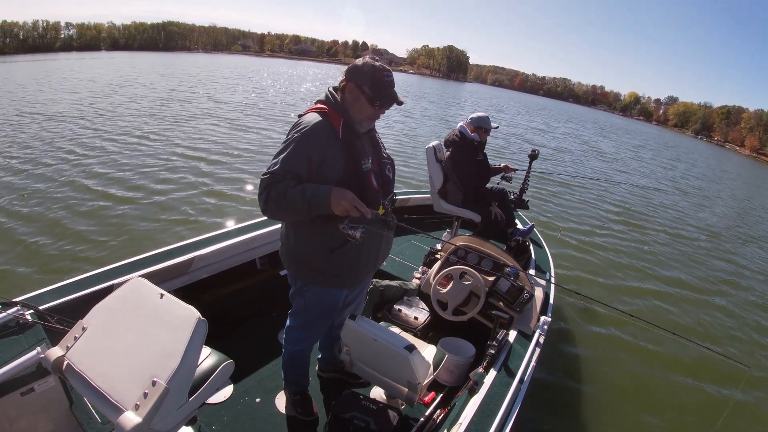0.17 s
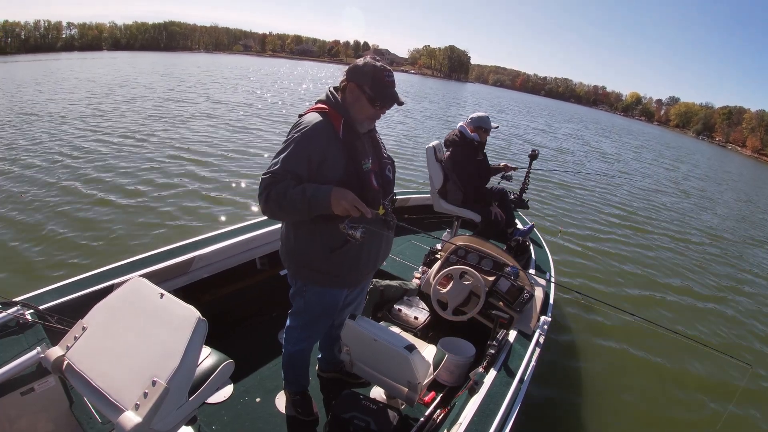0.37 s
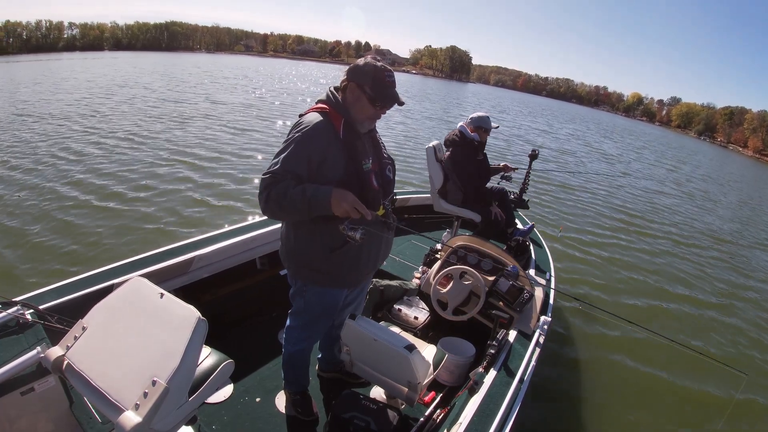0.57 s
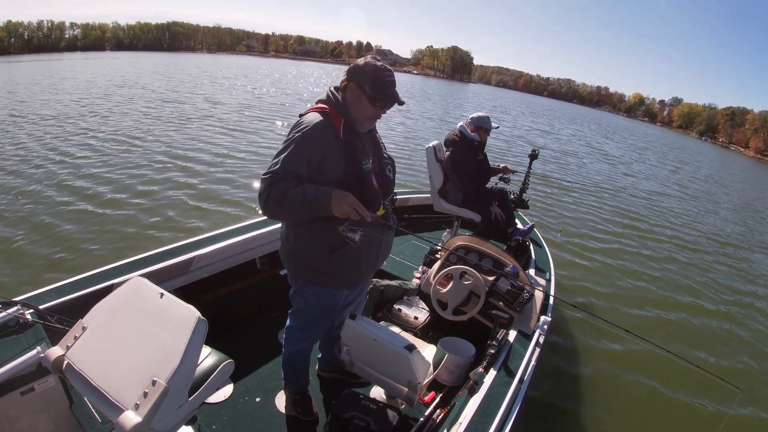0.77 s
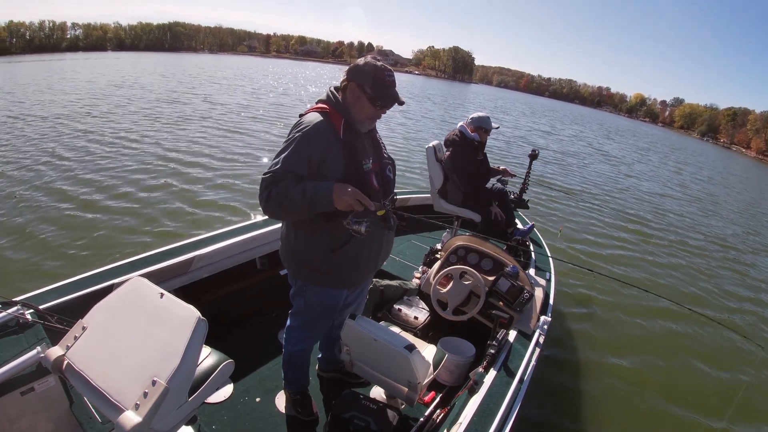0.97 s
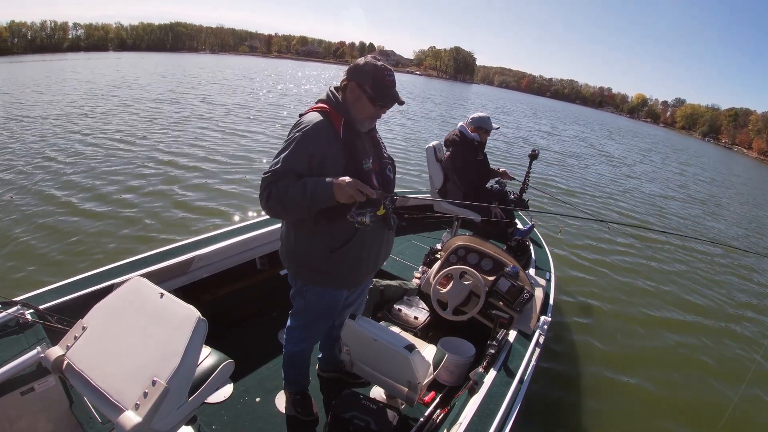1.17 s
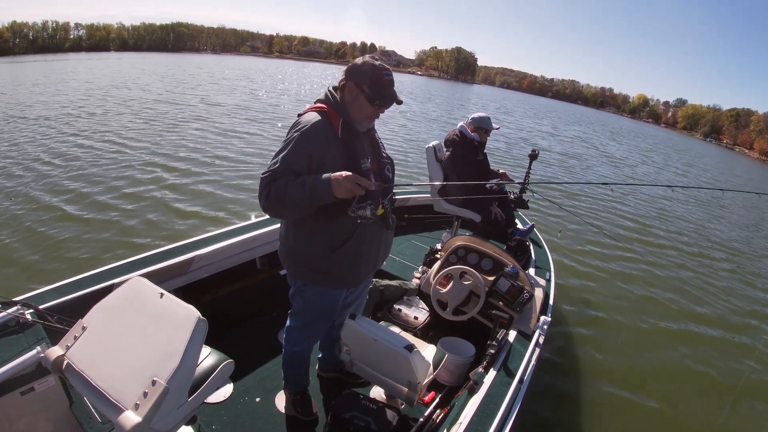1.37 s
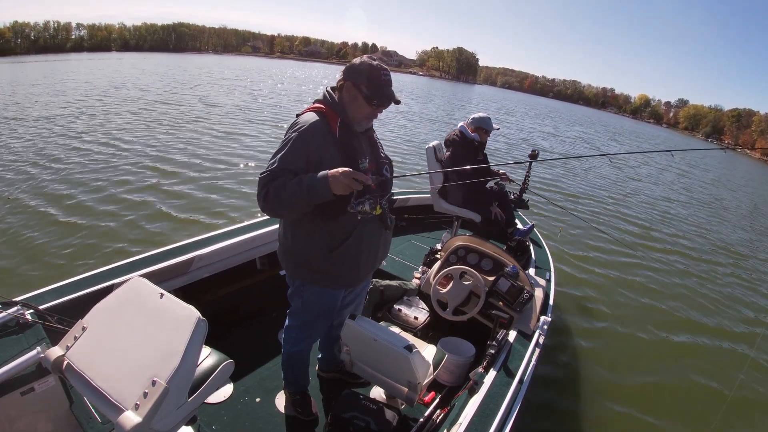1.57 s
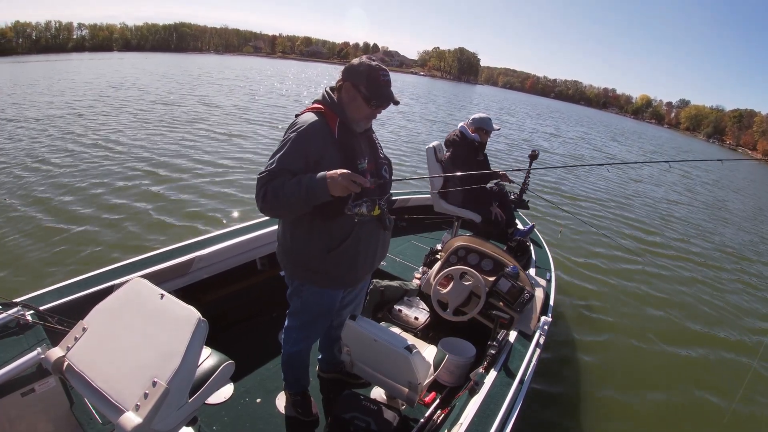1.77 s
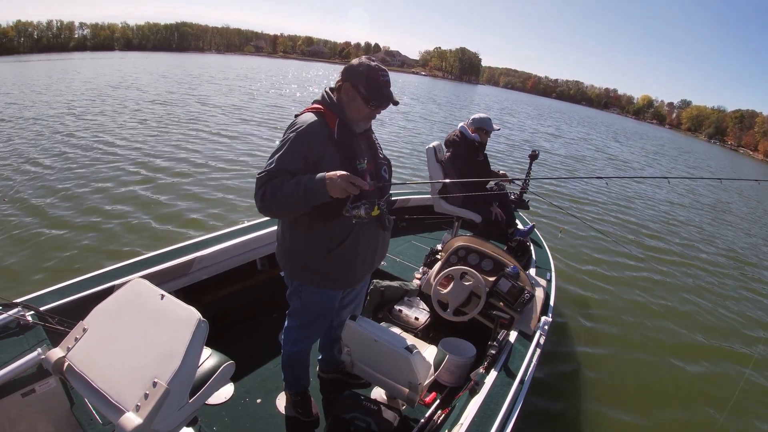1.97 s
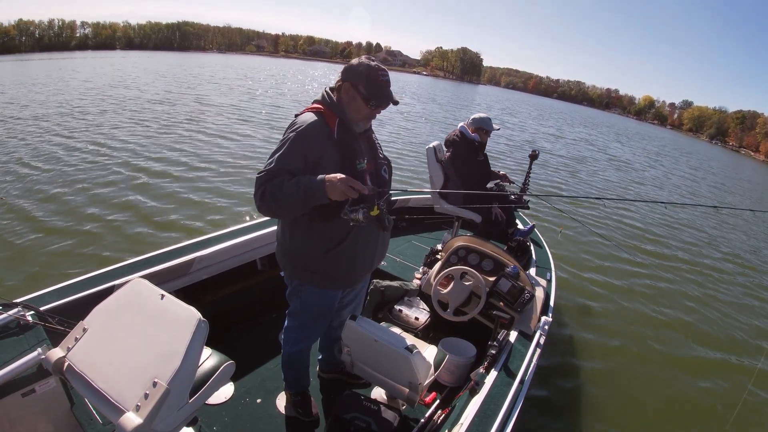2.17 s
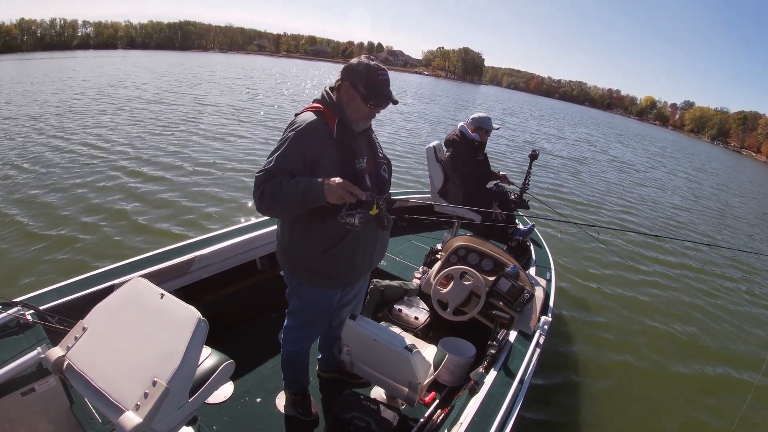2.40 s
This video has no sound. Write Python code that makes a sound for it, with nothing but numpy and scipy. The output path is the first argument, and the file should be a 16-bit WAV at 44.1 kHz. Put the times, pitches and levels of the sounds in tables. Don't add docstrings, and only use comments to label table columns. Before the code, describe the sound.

Small waves slap a metal boat hull with dull knocks and gulps, wind rumbling low

```python
import sys
import numpy as np
from scipy import signal
from scipy.fft import rfft, irfft, next_fast_len
from scipy.io import wavfile
from scipy.ndimage import uniform_filter1d, map_coordinates

SR = 44100
rng = np.random.default_rng(int(sys.argv[2]) if len(sys.argv) > 2 else 0)


def inscribe(sig):
    pcm = np.round(np.clip(np.atleast_2d(sig).T, -1, 1) * 32767)
    wavfile.write(sys.argv[1], SR, pcm.astype(np.int16))


def amplitude_ratio(level_db):
    exponent = np.asarray(level_db, float) / 20
    return 10 ** exponent


N = 107471


def unit(x):
    return x / np.sqrt(np.mean(x ** 2) + 1e-20)


def wobble(rate, size=None):
    size = size or N
    knots = rng.standard_normal(size // 60)
    return map_coordinates(knots, [np.arange(size) * rate / SR])


def noise(gain, size=None):
    size = size or N
    m = next_fast_len(size + 8192)
    spectrum = rfft(rng.standard_normal(m)) * gain(np.fft.rfftfreq(m, 1 / SR))
    return unit(irfft(spectrum, m)[:size])


def along(points):
    f, v = np.transpose(points)
    return lambda hz: amplitude_ratio(np.interp(np.log(hz + 1), np.log(f + 1), v))


def hump(centre_hz, width_hz):
    return lambda hz: np.exp(-2 * ((hz - centre_hz) / width_hz) ** 2)


def add(track, s, sound):
    track[max(round(s * SR), 0):][:len(sound)] += sound


def slaps():
    # [start_s, peak_db, low_db and high_db (panels over the middle ones), t60_s]
    waves = [(.109, -43.5, 3, -15.5, 0.14), (0.135, -52, 6.5, -25, 0.14), (.17, -56.5, 1.5, -4, 0.35),
             (0.217, -54, 3, -3, 0.059), (0.265, -42, -5.5, -26.5, 0.17), (.294, -63, 6.5, -17, 0.24),
             (0.405, -64, 4, -17, 0.21), (0.0, -63, 4, -8, 0.079), (2.27, -66, 11.5, -25, 0.34),
             (0.497, -72, -3, -13, 0.13), (.714, -60, 8, -15, 0.13), (0.875, -64, 0.5, -15, 0.42),
             (1.177, -60, -11, -33, 0.07), (1.312, -48, -18, -5.5, 0.13), (1.336, -41, 0, -21, 0.063),
             (1.361, -55, 5.5, -17, 0.16), (1.588, -54, 3, -15, 0.17), (1.758, -58.5, -3, -17, 0.12),
             (1.896, -44.5, 1.5, -26, 0.23), (1.919, -45.5, -4.5, -12.5, 0.19),
             (1.974, -52.5, -2.5, -27, 0.11), (2.075, -61, -8, -9, 0.14), (2.214, -56, -2.5, -12.5, 0.22),
             (2.342, -51, 4.5, -5, 0.13), (2.396, -39, -3, -8.5, 0.083), (2.42, -34, -3, -11, 0.047)]
    # [pitch_hz, level_db]
    low_panels = [(85, -7.5), (135, -5), (180, -4.5), (225, -1)]
    middle_panels = [(308, -5), (365, -5.5)]
    high_panels = [(500, 3), (600, -9), (680, -0.5), (790, -4)]
    rise_s, trim_db, slosh_db = 0.005024, -1.5, -8
    high_damping = 0.47
    roughness = 0.3
    out, t = np.zeros(N + SR), np.arange(SR // 3) / SR
    rise = 1 - np.exp(-(t / rise_s) ** 2)
    for s, db, low_db, high_db, t60 in waves:
        slosh_colour = [(90, low_db - 10.5), (190, low_db), (340, -5.5),
                        (600, high_db), (1300, high_db - 32), (3000, -75)]
        slosh = noise(along(slosh_colour), size=len(t))
        sound = amplitude_ratio(slosh_db - 60 * t / max(t60, 0.02)) * slosh
        groups = ((low_panels, low_db, t60), (middle_panels, 0, t60),
                  (high_panels, high_db, t60 * high_damping))
        for panels, over_db, life_s in groups:
            for hz, level_db in panels:
                struck_hz = hz * (1 + 0.027 * rng.standard_normal())
                turns = struck_hz * (t - rise_s) + 0.12 * rng.standard_normal()
                rough = 1 + roughness * wobble(hz / 6, size=len(t))
                decay = amplitude_ratio(over_db + level_db - 60 * t / max(life_s, 0.02))
                sound = sound + decay * rough * np.sin(2 * np.pi * turns)
        add(out, s - rise_s / 2, amplitude_ratio(db + trim_db) * rise * sound)
    return out[:N]


def plips():
    # [start_s, peak_db, pitch_hz, t60_s, rise_share (of pitch, over its life)]
    bursting = [(0.097, -55, 1473, 0.042, -0.15), (.14, -62.5, 481, 0.27, 0.15),
                (.187, -59.5, 1005, 0.13, -0.075), (.2, -59.5, 741, 0.12, -0.17),
                (.212, -59, 409, 0.067, 0.11), (1.241, -68.5, 1530, 0.06, -0.46),
                (.285, -63.5, 714, 0.096, 0.15), (.852, -66.5, 780, 0.045, 0),
                (.855, -57, 307, 0.07, 0.053), (.498, -50.5, 331, 0.067, 0.035),
                (.5, -63.5, 496, 0.051, -0.1), (.372, -71, 1890, 0.11, 0.11), (.495, -55, 743, 0.054, 0.1),
                (.72, -62, 743, 0.12, 0.078), (.864, -55.5, 485, 0.052, 0.1),
                (.927, -60.5, 2860, 0.035, 0.062), (1.237, -67.5, 937, 0.084, 0.058),
                (1.287, -51, 771, 0.077, -0.23), (1.596, -60, 483, 0.13, 0.075),
                (1.62, -60, 1720, 0.033, 0.074), (1.706, -59, 764, 0.097, 0.056),
                (1.739, -54.5, 917, 0.034, 0.036), (1.752, -66.5, 880, 0.074, -0.055),
                (1.92, -53.5, 667, 0.06, -0.042), (2.208, -57.5, 1182, 0.044, -0.066),
                (2.34, -61.5, 585, 0.18, -0.23)]
    # [start_s, peak_db, pitch_hz, t60_s,
    # rise_share]
    slap_tones = [(.109, -40.5, 310.4, 0.08, -0.029), (0.127, -44.5, 205, 0.24, -0.017),
                  (0.265, -41, 179.4, 0.11, -0.049), (.408, -56, 362.5, 0.16, 0.079),
                  (0.712, -55, 362, 0.18, -0.027), (1.302, -64.5, 680, 0.18, -0.37),
                  (1.591, -48.5, 173, 0.081, -0.011), (1.754, -49, 309.4, 0.12, 0.042),
                  (1.9, -32, 197, 0.055, -0.076), (1.921, -39, 184, 0.12, -0.066),
                  (2.399, -40, 182.7, 0.11, -0.12), (2.421, -50, 186, 0.088, 0.027),
                  (2.345, -53, 171, .08, 0.069), (1.391, -40, 98.4, 0.12, 0.062),
                  (1.903, -44, 92.5, 0.14, 0.17)]
    rise_s, rise_turns = 0.0024, 0.75
    roughness, spray_db, spray_width = 0.3, -6.5, 0.5
    out, t = np.zeros(N + SR), np.arange(SR // 4) / SR
    for s, db, hz, t60, rise in bursting + slap_tones:
        glide = 1 + rise * np.minimum(2 * t / t60, 1.5)
        turns = np.cumsum(hz * glide) / SR
        swell = 1 - np.exp(-(t / (rise_s + rise_turns / hz)) ** 2)
        shape = amplitude_ratio(-60 * t / t60) * swell
        rough = 1 + roughness * wobble(hz / 5, size=len(t))
        tone = rough * np.sin(2 * np.pi * turns)
        spray = amplitude_ratio(spray_db) * noise(hump(0.94 * hz, spray_width * min(hz, 1400)), size=len(t))
        add(out, s - rise_s / 2, amplitude_ratio(db + 0.5) * shape * (tone + spray))
    return out[:N]


def drops():
    # [middle_s, peak_db, pitch_hz, half_length_s, climb_share (of pitch, over the half length)]
    falls = [(.101, -58, 1400, .0015, -.1), (.176, -58, 1180, .017, .32), (.237, -65, 1620, .009, .3),
             (.265, -62, 1200, .0006, 0), (.318, -67, 1400, .005, .15), (.327, -63, 900, .0012, 0),
             (.716, -66, 950, .0015, 0), (1.288, -62, 4200, .0002, 0), (1.288, -70, 5600, .0015, 0),
             (1.295, -66, 2700, .0015, 0), (1.296, -66, 3650, .0017, .03), (1.307, -67, 4750, .0013, 0),
             (1.331, -57, 1800, .0004, 0), (1.3945, -63, 2600, .0009, 0), (1.592, -62, 630, .003, 0),
             (1.621, -66, 900, .001, 0), (1.693, -63, 4650, .002, .02), (1.703, -56, 800, .002, 0),
             (1.7155, -65, 2800, .002, .02), (1.732, -64, 1400, .0025, -.04), (1.749, -68, 3600, .0012, 0),
             (1.749, -62, 1800, .0007, 0), (1.749, -55, 860, .003, 0), (1.922, -62, 1150, .001, 0),
             (1.93, -63, 850, .004, 0), (2.079, -63, 800, .0007, 0), (2.209, -55, 1000, .0006, 0),
             (2.433, -62, 900, .001, 0)]
    roughness, trim_db = 0.45, -2
    lead = SR // 20
    out, t = np.zeros(N + SR), (np.arange(SR // 10) - lead) / SR
    for s, db, hz, half_s, climb in falls:
        turns = hz * t * (1 + climb * t / half_s / 2)
        ragged = 1 + roughness * wobble(268, size=len(t)) * min(half_s * 100, 1)
        swell = np.exp(-(t / half_s) ** 2)
        add(out, s - lead / SR, amplitude_ratio(db + trim_db) * ragged * swell * np.cos(2 * np.pi * turns))
    return out[:N]


def ticks():
    # [start_s, peak_db, centre_hz, length_s]
    droplets = [(0.1, -69.5, 3600, 0.0089), (0.095, -62, 1650, 0.017), (0.187, -62, 1960, 0.0063),
                (0.263, -67, 3130, 0.0086), (0.366, -67.5, 2080, 0.013), (0.495, -59.5, 2160, 0.0045),
                (1.288, -68.5, 2500, 0.018), (1.293, -72, 4000, 0.027), (1.523, -85, 4920, .005),
                (1.614, -68, 1380, 0.028), (1.699, -60, 5070, 0.0077), (1.701, -65, 3000, 0.006),
                (1.71, -72.5, 4700, 0.024), (1.739, -68.5, 1490, 0.02), (1.895, -72, 3900, 0.016),
                (1.92, -66, 3110, 0.0047), (2.005, -72.5, 4330, 0.024), (0.17, -65.5, 1240, 0.02),
                (0.327, -75, 1920, 0.017)]
    out, t = np.zeros(N + SR), np.arange(SR // 10) / SR
    for s, db, hz, length_s in droplets:
        age = 3 * t / length_s
        shape = age * np.exp(1 - age)
        splash = noise(hump(hz, 0.5 * hz), size=len(t))
        add(out, s, amplitude_ratio(db - 6) * shape * splash)
    return out[:N]


def lapping():
    # [time_s, level_db]
    ripples = [(0, -67), (.32, -64), (.49, -68.5), (.6, -68), (.68, -67), (.76, -69.5), (.84, -67.5),
               (.93, -66), (1.0, -72.5), (1.12, -65.5), (1.26, -67), (1.45, -68.5), (1.56, -69),
               (1.85, -67.5), (2.05, -67), (2.17, -67), (2.3, -64.5), (2.44, -61.5)]
    # [frequency_hz, level_db]
    water_colour = [(60, -5.5), (130, -1.5), (200, -5), (370, -16), (450, -24.5), (600, -33.5),
                    (800, -32.5), (1200, -59.5)]
    # [frequency_hz, level_db]
    hull_colour = [(500, -18), (650, -5.5), (800, 2), (950, -9), (1300, -31.5)]
    lapping_db, murmur_db = 2, -86
    s, db = np.transpose(ripples)
    strength_db = lapping_db + np.interp(np.arange(N) / SR, s, db) + 2.5 * wobble(25)
    burble = amplitude_ratio(strength_db) * noise(along(water_colour))
    murmur = amplitude_ratio(murmur_db + 1.5 * wobble(11)) * noise(along(hull_colour))
    return burble + murmur


def wind():
    # [time_s, buffeting_db]
    gusts = [(0.0, -46.5), (0.059, -47), (0.14, -66.5), (0.39, -50.5), (0.611, -58.5), (0.65, -51.5),
             (0.859, -58.5), (0.939, -50), (1.078, -55.5), (1.18, -40.5), (1.55, -50.5), (1.59, -64),
             (1.661, -48), (1.941, -45), (1.981, -53.5), (2.15, -47.5), (2.17, -54.5), (2.44, -50.5)]
    # [frequency_hz, level_db]
    rumble_colour = [(12, -22), (22, -0.5), (31, 3), (50, -10), (75, -11), (110, -26.5), (200, -44),
                     (500, -91.5)]
    s, db = np.transpose(gusts)
    rumble = noise(along(rumble_colour))
    power = np.abs(uniform_filter1d(rumble ** 2, size=5000))
    rumble = rumble / np.sqrt(power + 0.11)
    gust_db = np.interp(np.arange(N) / SR, s, db)
    return amplitude_ratio(gust_db + wobble(18)) * unit(rumble)


def circuits():
    # [frequency_hz, level_db]
    hiss_colour = [(400, -3), (900, 6.5), (1500, 3.5), (3000, 0.5), (5300, -1.5), (6700, -0.5), (8000, -8),
                   (10500, -11.5), (12700, -32)]
    # [centre_hz, width_hz, level_db, start_share and length_share (of a picture)]
    bursts = [
        (6420, 1300, -77.5, 0.524, 0.083),
        (6584, 1220, -78.5, 0.678, 0.38),
        (9250, 2800, -89.5, 0.85, 0.17),
        (4740, 840, -88.5, 0.55, 0.42),
    ]
    picture_hz, hiss_db = 29.97, -79
    scatter_db, jitter = 2.5, 0.025
    turn = np.arange(N) / SR * picture_hz
    out = amplitude_ratio(hiss_db) * noise(along(hiss_colour))
    for hz, width_hz, db, start, length in bursts:
        phase = (turn - start + jitter * wobble(30)) % 1
        gate = uniform_filter1d(1. * (phase < length), size=60)
        level = amplitude_ratio(db + scatter_db * (wobble(29.99) + wobble(150)))
        out = out + level * gate * noise(hump(hz, width_hz))
    return out


def scene():
    water = slaps() + plips() + drops() + ticks() + lapping()
    return (water + wind() + circuits())[None]


def low_pass(x):
    return signal.sosfilt(signal.butter(12, 12730, fs=SR, output="sos"), x)


def record(dry):
    return low_pass(dry)


dry = scene()
out = record(dry)
inscribe(out)
```